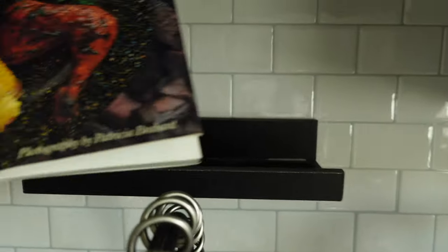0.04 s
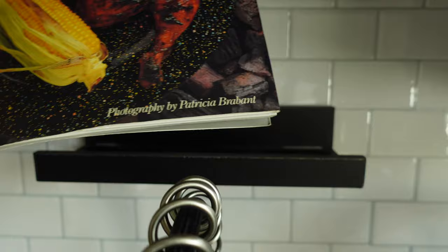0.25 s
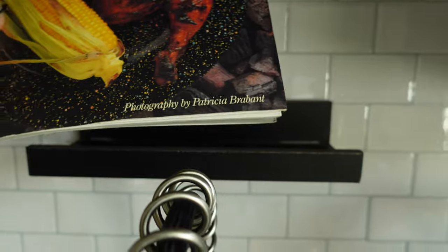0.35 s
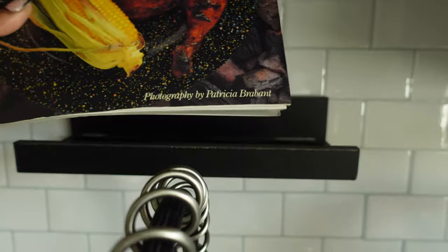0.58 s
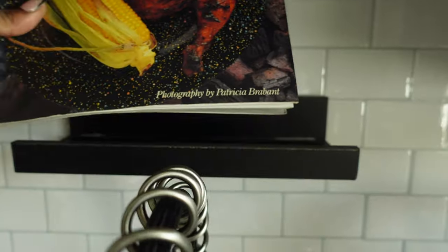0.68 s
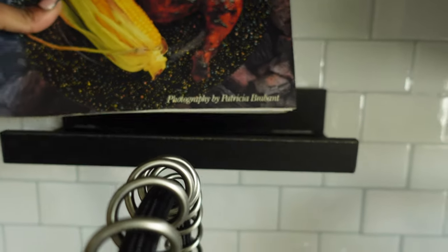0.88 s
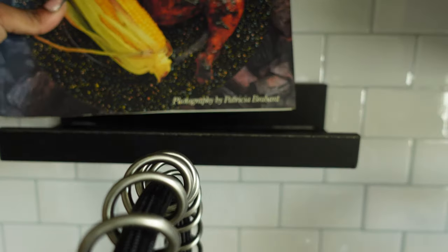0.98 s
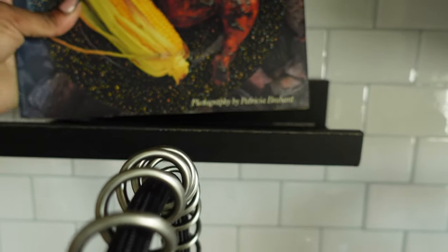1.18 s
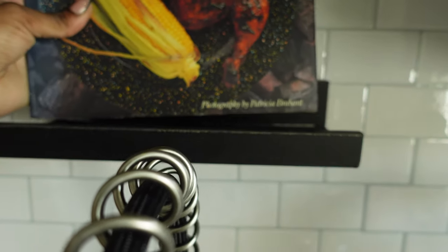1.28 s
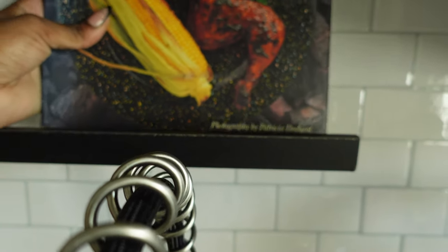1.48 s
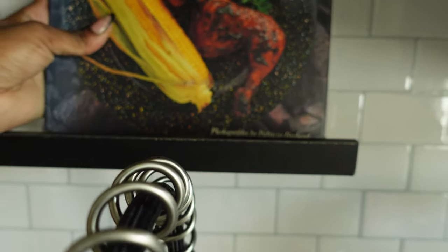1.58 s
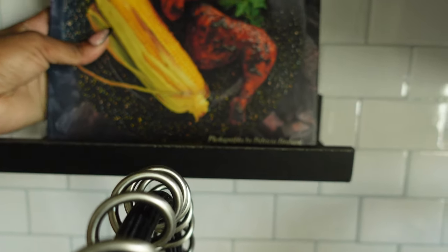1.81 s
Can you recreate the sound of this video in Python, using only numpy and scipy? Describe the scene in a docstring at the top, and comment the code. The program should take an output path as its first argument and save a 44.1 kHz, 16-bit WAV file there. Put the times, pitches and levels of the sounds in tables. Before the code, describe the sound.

A large paperback slides along a narrow ledge with a swelling papery rub, faint squeaks and ticks, then lands with a soft knock and dull thud. It is heard up close in a small kitchen with a low appliance hum.

```python
"""An appliance hums low in a small tiled kitchen. Close by, a hand slides a large paperback along a
narrow ledge on the wall: countless tiny slips ring its cover in one swelling rub, with faint squeaks
and ticks from its catching edges. A faint nudge follows. At about 1.55 s the book drops onto the ledge
with a soft knock and a dull thud of pages, then settles under one last faint push."""
import sys
import numpy as np
from scipy import signal
from scipy.fft import rfft, irfft
from scipy.io import wavfile

SR = 44100
rng = np.random.default_rng(int(sys.argv[2]) if len(sys.argv) > 2 else 0)


def digitize_waveform(pressure):
    """Quantize a signal to 16-bit integers and store it at the path in sys.argv[1].

    Rows of a 2-D input are taken as channels; values are limited to [-1, 1].
    """
    field = np.atleast_2d(pressure).T
    bounded = np.clip(field, -1, 1)
    quanta = np.round(bounded * 32767).astype(np.int16)
    wavfile.write(sys.argv[1], SR, quanta)


N = 81585

# appliance rumble (frequency [Hz], relative level [dB])
RUMBLE_COLOUR = [(20, -26), (35, -16), (50, -14), (72, -9), (95, 6), (125, 4), (180, -5.5), (260, -7),
                 (370, -10.5), (480, -18), (650, -12), (860, -21.5), (1400, -23.5), (3000, -25.5),
                 (8000, -32), (16000, -38.5)]
# stereo width of the rumble (frequency [Hz], side gain [dB])
RUMBLE_SIDE = [(25, -8), (45, 7.5), (80, -26), (180, -7.5), (400, -7), (1500, -1), (12000, -21.5)]
# appliance hum lines (frequency [Hz], level [dB])
HUM_LINES = [(100, -63), (120, -64), (150, -59), (222, -67), (350, -67.5)]
RUMBLE_DB = -53

# low rustle of the hand's grip (time [s], level [dB])
GRIP_LEVELS = [(0, -52.5), (.08, -67.5), (.18, -61), (.27, -51.5), (.36, -64), (.55, -59.5), (.7, -79),
               (1.6, -65), (1.74, -55.5), (1.805, -70), (1.832, -48.5), (1.85, -44)]
# its colour (frequency [Hz], relative level [dB])
GRIP_COLOUR = [(100, -32), (195, 10), (300, -4), (520, -13), (1000, -23), (1400, -8), (1900, -26),
               (6000, -35)]

# the three strokes (time [s], relative rub level [dB], relative hiss level [dB])
SLIDE_STROKE = [(0, -65, -63.5), (.106, -73, -73), (.114, -62, -60), (.166, -58, -49), (.19, -63, -53),
                (.244, -48, -45.5), (.42, -43.5, -45.5), (.484, -36, -34.5), (.526, -39, -41),
                (.552, -36.5, -41.5), (.596, -36.5, -41.5), (.644, -34, -32.5), (.686, -35.5, -32.5),
                (.712, -39.5, -35.5), (.736, -39.5, -38), (.746, -42.5, -45.5), (.89, -47, -59),
                (.94, -48.5, -62)]
NUDGE_STROKE = [(0.961, -53, -61.5), (1.071, -60, -84), (1.11, -52, -52.5), (1.129, -53, -65),
                (1.175, -53.5, -57), (1.25, -57, -60), (1.285, -71, -61.5), (1.35, -70, -58),
                (1.412, -73, -61.5)]
PUSH_STROKE = [(1.64, -61, -72), (1.663, -62.5, -66), (1.737, -61.5, -58.5), (1.8, -67.5, -67),
               (1.822, -59, -63), (1.831, -51, -53.5), (1.85, -47.5, -49)]
STROKE_FADE_S, RUB_TRIM_DB, HISS_TRIM_DB = 0.017, -2, 1
SLIPS_PER_S, SLIP_SPREAD_DB, LARGE_SLIP_SHARE = 2500, 3, 0.31
JUDDER_DB, JUDDER_HZ = 0.33, 90
# body of the rub and fine hiss of the paper (frequency [Hz], relative level [dB])
RUB_COLOUR = [(100, -42), (260, -12), (480, -11.5), (680, -12.5), (900, -21), (1200, -6), (1380, -13.5),
              (1620, -0.5), (2100, 2), (2480, -3.5), (2800, 2.5), (3500, -3.5), (4200, -10.5), (6000, -19),
              (16000, -25)]
HISS_COLOUR = [(300, -21), (900, -17.5), (2000, -1.5), (4000, 4.5), (5600, 2), (7800, 2), (10000, -2.5),
               (13000, -5.5), (16000, -6.5)]
# resonances of the cover (frequency [Hz], width [Hz], relative level [dB])
COVER_MODES = [(1620, 99, -17.5), (1910, 79, -8.5), (1985, 64, -7), (2316, 150, -13), (2702, 67, -10),
               (3320, 64, -14), (3620, 18, -1), (4510, 14, -30), (5590, 73, -6), (7400, 72, -16),
               (9440, 43, -4)]
FLEX_DEPTH, FLEX_HZ = 0.014, 4
# a resonance that sinks as more cover touches (time [s], frequency [Hz], level against the rub [dB])
CONTACT_SWEEP = [(.18, 3600, -23), (.215, 3500, 8), (.25, 3420, 5.5), (.3, 3340, 4), (.36, 3200, 0.5),
                 (.42, 2980, -8), (.48, 3040, -1.5), (.53, 3100, -10), (.8, 3030, -7.5), (1.25, 2840, -2),
                 (1.65, 2260, 0)]
# hollow note of the narrowing gap behind the book (time [s], level against the rub [dB])
GAP_LEVELS = [(.35, -56), (.47, -16.5), (.66, -12), (.82, -12.5), (1.25, -6), (1.45, -13)]
CONTACT_WIDTH_HZ, GAP_HZ, GAP_WIDTH_HZ = 600, 975, 410

# cover squeaks (start [s], length [s], pitch [Hz], width [Hz], level [dB], share of clean tone [0-1])
COVER_SQUEAKS = [(.107, 0.028, 5920, 398, -54, .3), (0.139, 0.18, 10440, 800, -60.5, 0.15),
                 (0.233, 0.043, 3530, 128, -45, 0.2), (0.334, 0.033, 3190, 128, -43, 0.2),
                 (0.453, 0.042, 2737, 110, -40, 0.3), (0.54, 0.039, 3248, 129, -39.5, 0.4),
                 (0.63, 0.029, 4200, 260, -39, 0.1), (0.971, 0.019, 8200, 700, -56.5, .2),
                 (1.226, 0.21, 7700, 350, -76, 0.1), (1.345, 0.083, 2760, 170, -65, 0),
                 (1.323, 0.1, 11100, 650, -69, 0), (1.65, 0.018, 2310, 159, -54, 0.6)]
SQUEAK_FADE_S, SQUEAK_JITTER = 0.014, 0.724

# edges catching (time [s], level [dB], rise [s], decay [s], treble tilt [dB/octave])
EDGE_TICKS = [(0.112, -51, .001, 0.012, 9), (0.516, -29, 0.0027, 0.0073, 14),
              (0.9382, -32, .0011, 0.0052, 2.5), (1.104, -39, 0.0051, 0.0048, 6.5),
              (1.175, -41.5, 0.0024, 0.0045, 0), (1.553, -49, 0.0017, 0.0043, 1),
              (1.5606, -43.5, 0.0032, 0.0067, 6), (1.5967, -41, .007, 0.0086, 10),
              (1.6217, -42, 0.0015, 0.0038, -0.5), (1.725, -50, 0.0054, 0.0076, 6)]
# colour of a tick before its tilt (frequency [Hz], relative level [dB])
TICK_COLOUR = [(200, -21), (900, -3), (1900, -7), (2600, 7.5), (3800, -1), (7500, -9.5), (11000, -20.5),
               (16000, -25.5)]
SNAP_HZ, SNAP_DB, SNAP_DECAY_S = 2730, 4.5, 0.0012

# the book lands (time [s], ring level [dB], tilt [dB/octave], roll-off [Hz], page thud level [dB])
LANDINGS = [(1.5534, -30.5, 0.5, 1510, -39), (1.6201, -40, 0, 2600, -52), (1.835, -43.5, 9, 1700, -54)]
# modes of the loaded ledge (frequency [Hz], relative level [dB], t60 [s])
LEDGE_MODES = [(133.3, 1.5, 0.088), (201, 5, 0.044), (267.4, -14, 0.37), (305, 8, 0.03), (404, 1.5, 0.03),
               (648, 3, 0.032), (787, 1, 0.029), (1013, -2.5, 0.018), (1214, -2, 0.014),
               (1420, -0.5, 0.022), (3000, -21, 0.011), (3800, -6, 0.018)]
BEND_LAG_SCALE_S, KNOCK_RISE_S = 0.0032, 0.003
# dull thud of the block of pages (frequency [Hz], relative level [dB])
PAGES_COLOUR = [(90, 0), (160, -19), (400, 6), (700, -8), (1400, 0), (1800, -22), (4000, -34), (12000, -48)]
PAGES_LAG_S, PAGES_DECAY_S = 0.0025, 0.01

# kitchen reverb (frequency [Hz], t60 [s])
ROOM_DECAY = [(150, 0.64), (1000, 0.94), (4000, 0.03), (14000, 0.35)]
# stereo width of the book's reverb (frequency [Hz], side gain [dB])
ROOM_SIDE = [(150, -19), (700, -21), (1500, -29), (3000, -64), (5000, -55), (7000, -64), (9500, -45),
             (12500, -66)]
ROOM_DB, BOOK_LOW_CUT_HZ, HIGH_CUT_HZ = -16, 105, 15800
REFLECTION_DELAY_S, REFLECTION_DRIFT_PER_S, REFLECTION_DB = .006, 0.037, -17.5

TIME = np.arange(N) / SR
FREQS = np.fft.rfftfreq(2 * N, 1 / SR)


def amp(db):
    """Decibels to gain."""
    return 10 ** (np.asarray(db) / 20)


def unit(x):
    """Scales to rms 1."""
    return x / np.sqrt(np.mean(x ** 2) + 1e-20)


def curve(points, hz=FREQS):
    """Reads a table on a log-frequency axis."""
    f, value = np.transpose(points)
    return np.interp(np.log(hz + 1), np.log(f + 1), value)


def eq(x, db):
    """Filters by a dB curve over FREQS."""
    return irfft(rfft(x, 2 * N) * amp(db))[:N]


def noise(colour):
    """Steady noise of a given colour."""
    return unit(eq(rng.standard_normal(N), curve(colour)))


def wander(hz):
    """Random modulation that rolls off above the given rate."""
    return unit(eq(rng.standard_normal(N), -20 * np.log10(1 + (FREQS / hz) ** 2)))


def resonate(x, hz, width):
    """A resonance whose pitch can glide."""
    turn = np.exp(2j * np.pi * np.cumsum(hz * np.ones(N)) / SR)
    pole = np.exp(-np.pi * width / SR)
    return 2 * (turn * signal.lfilter([1 - pole], [1, -pole], x / turn)).real


def burst(start, rise, decay):
    """Envelope with a quick attack and an exponential fall."""
    age = np.maximum(TIME - start, 0)
    return np.minimum(age / rise, 1) * np.exp(-age / decay)


def appliance():
    """A bed of rumble and wavering hum, as mid and side."""
    hum = np.zeros(N)
    for hz, db in HUM_LINES:
        phase = 2 * np.pi * (hz * TIME + rng.random()) + 0.53 * wander(0.75)
        hum += amp(db) * np.sqrt(2) * np.sin(phase)
    mid = amp(RUMBLE_DB) * noise(RUMBLE_COLOUR) + hum
    side = amp(RUMBLE_DB) * eq(noise(RUMBLE_COLOUR), curve(RUMBLE_SIDE))
    return mid, side


def grip():
    """The hand shifts its grip with a low rustle."""
    return amp(np.interp(TIME, *np.transpose(GRIP_LEVELS))) * noise(GRIP_COLOUR)


def slips():
    """Paper friction: countless tiny slips with some larger ones among them."""
    sizes = amp(SLIP_SPREAD_DB * np.minimum(rng.exponential(1, N), 4)) * rng.choice([-1, 1], N)
    large = unit(sizes * (rng.random(N) < SLIPS_PER_S / SR))
    return np.sqrt(LARGE_SLIP_SHARE) * large + np.sqrt(1 - LARGE_SLIP_SHARE) * rng.standard_normal(N)


def slip_band(hz, width):
    """Slips through one steep resonance."""
    return unit(resonate(resonate(slips(), hz, width), hz, width))


def reflections(x):
    """Adds close bounces off tiles and ledge, whose paths drift as the book moves; rms 1."""
    out = x
    for length, drift, sign in rng.uniform(-1.008, 1, size=(8, 3)):
        delay = REFLECTION_DELAY_S * (.55 + .45 * length) * (1 + REFLECTION_DRIFT_PER_S * drift * TIME)
        out = out + np.sign(sign) * amp(REFLECTION_DB) * np.interp(TIME - delay, TIME, x)
    return unit(out)


def cover(colour):
    """Slips ring the cover, whose resonances shift as it flexes."""
    friction = slips()
    flex = 1 + FLEX_DEPTH * wander(FLEX_HZ)
    ring = sum(2 * amp(db) * resonate(friction, hz * flex, width) for hz, width, db in COVER_MODES)
    return reflections(eq(friction + ring, curve(colour)))


def rubbing():
    """The cover drags along wall and ledge, juddering slightly."""
    rub_gain, hiss_gain = np.zeros((2, N))
    for stroke in (SLIDE_STROKE, NUDGE_STROKE, PUSH_STROKE):
        times, rub_db, hiss_db = np.transpose(stroke)
        moving = np.clip(1 + np.minimum(TIME - times[0], times[-1] - TIME) / STROKE_FADE_S, 0, 1)
        rub_gain += moving * amp(np.interp(TIME, times, rub_db) + RUB_TRIM_DB)
        hiss_gain += moving * amp(np.interp(TIME, times, hiss_db) + HISS_TRIM_DB)
    times, hz, db = np.transpose(CONTACT_SWEEP)
    sweep = slip_band(np.interp(TIME, times, hz), CONTACT_WIDTH_HZ)
    contact = reflections(sweep) * amp(np.interp(TIME, times, db))
    gap = slip_band(GAP_HZ, GAP_WIDTH_HZ) * amp(np.interp(TIME, *np.transpose(GAP_LEVELS)))
    rub = rub_gain * (cover(RUB_COLOUR) + contact + gap)
    hiss = hiss_gain * cover(HISS_COLOUR)
    return (rub + hiss) * amp(JUDDER_DB * wander(JUDDER_HZ))


def squeaks():
    """The glossy cover squeaks: narrow-band friction, a share of it locking into a wavering tone."""
    out = np.zeros(N)
    for start, length, hz, width, db, clean in COVER_SQUEAKS:
        fade = np.clip(np.minimum(TIME - start, start + length - TIME) / SQUEAK_FADE_S, 0, 1)
        tone = 0
        if clean > 0:
            pitch = hz + SQUEAK_JITTER * width * wander(width)
            tone = np.sqrt(2 * clean) * np.sin(2 * np.pi * np.cumsum(pitch) / SR)
        out += amp(db) * fade * (tone + np.sqrt(1 - clean) * slip_band(hz, width))
    return out


def ticks():
    """Edges catch and let go: a ringing snap, stronger in dull ticks, and a short cluster of slips."""
    out = np.zeros(N)
    octaves = np.log2(np.maximum(FREQS, 500) / 4000)
    for start, db, rise, decay, tilt in EDGE_TICKS:
        cluster = burst(start, rise, decay) * unit(eq(slips(), curve(TICK_COLOUR) + tilt * octaves))
        snap = burst(start, rise, SNAP_DECAY_S) * np.sin(2 * np.pi * SNAP_HZ * (TIME - start))
        out += amp(db) * (cluster + amp(SNAP_DB - tilt) * snap)
    return out


def knocks():
    """The book lands and settles, briefly ringing the ledge; soft contact keeps the high modes quiet."""
    out = np.zeros(N)
    for start, level_db, tilt, rolloff_hz, _ in LANDINGS:
        for hz, db, t60 in LEDGE_MODES:
            ratio = hz / 500
            arrival = start + BEND_LAG_SCALE_S * max(ratio ** -.5 - .5, 0)  # bass travels slower
            envelope = burst(arrival, KNOCK_RISE_S, t60 / np.log(1000))
            gain = amp(level_db + db + tilt * np.log2(ratio)) / np.hypot(1, (hz / rolloff_hz) ** 2)
            out += gain * envelope * np.sin(2 * np.pi * hz * (TIME - arrival))
    return out


def page_thuds():
    """The pages thud together just after each knock."""
    blows = sum(amp(db) * burst(start + PAGES_LAG_S, KNOCK_RISE_S, PAGES_DECAY_S)
                for start, *_, db in LANDINGS)
    return blows * noise(PAGES_COLOUR)


def room(x):
    """Short diffuse tail of the tiled kitchen."""
    hz, t, spectrum = signal.stft(rng.standard_normal(SR // 2), SR, nperseg=256)
    decay = amp(-60 * t / curve(ROOM_DECAY, hz)[:, None])
    tail = signal.istft(spectrum * decay, SR, nperseg=256)[1]
    tail *= np.minimum(np.arange(len(tail)) / SR / 0.0034, 1)  # soft attack
    return signal.fftconvolve(x, tail / np.linalg.norm(tail))[:N]


def scene():
    """The book dead centre, too small to radiate deep bass; room and rumble give a little width."""
    low_cut = signal.butter(2, BOOK_LOW_CUT_HZ, "highpass", fs=SR, output="sos")
    book = signal.sosfilt(low_cut, rubbing() + squeaks() + ticks() + knocks() + grip() + page_thuds())
    bed_mid, bed_side = appliance()
    mid = book + amp(ROOM_DB) * room(book) + bed_mid
    side = eq(room(book), curve(ROOM_SIDE)) + bed_side
    return np.array([mid + side, mid - side])


def record(dry):
    """A steep high cut trims the top of the mix."""
    high_cut = signal.firwin(767, HIGH_CUT_HZ, window=("kaiser", 9), fs=SR)
    return signal.oaconvolve(dry, high_cut[None], "same")


dry = scene()
out = record(dry)
digitize_waveform(out)
```